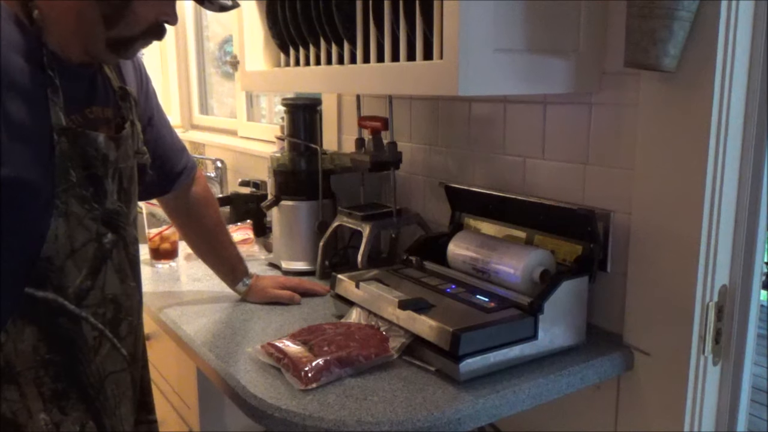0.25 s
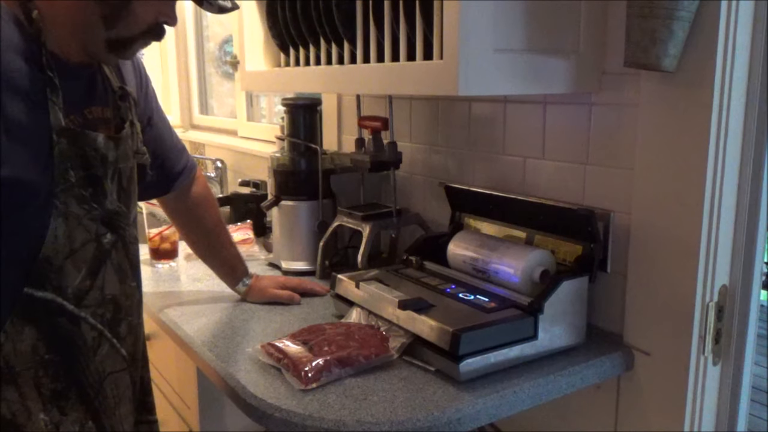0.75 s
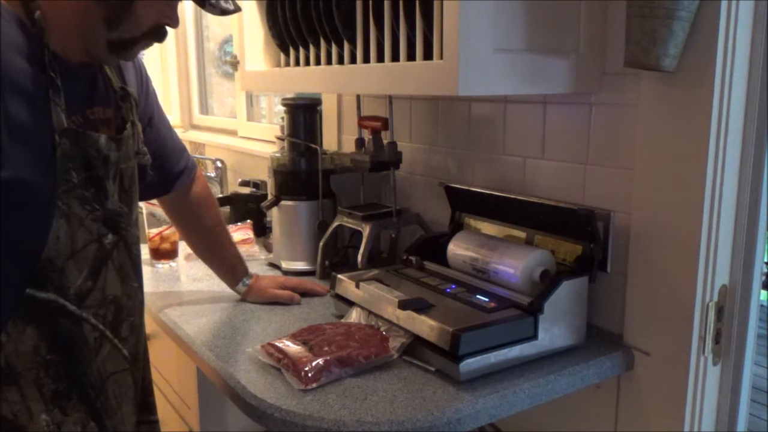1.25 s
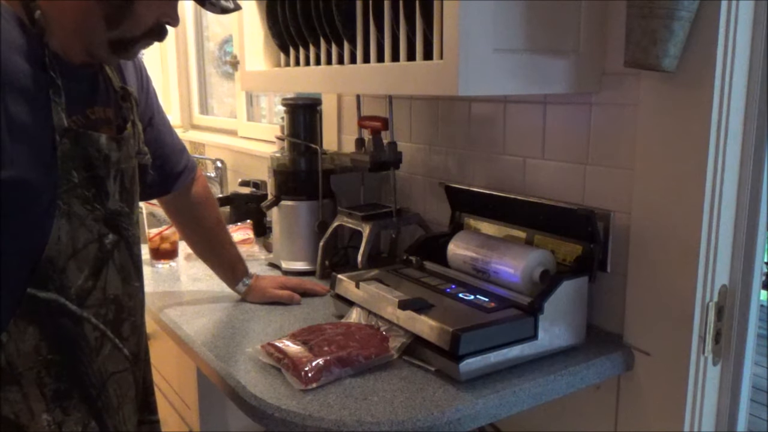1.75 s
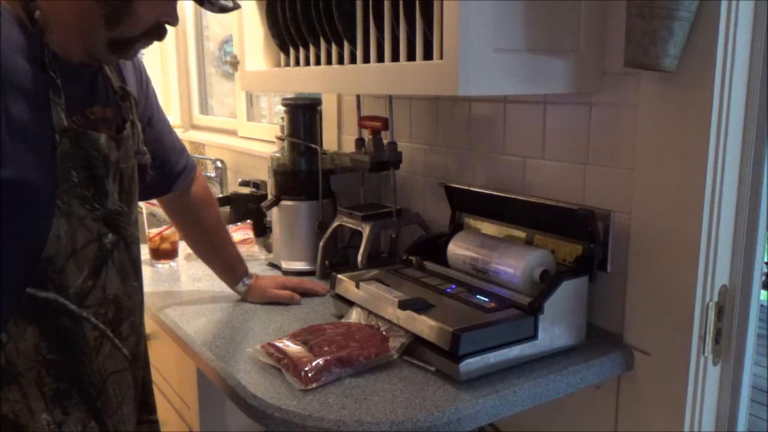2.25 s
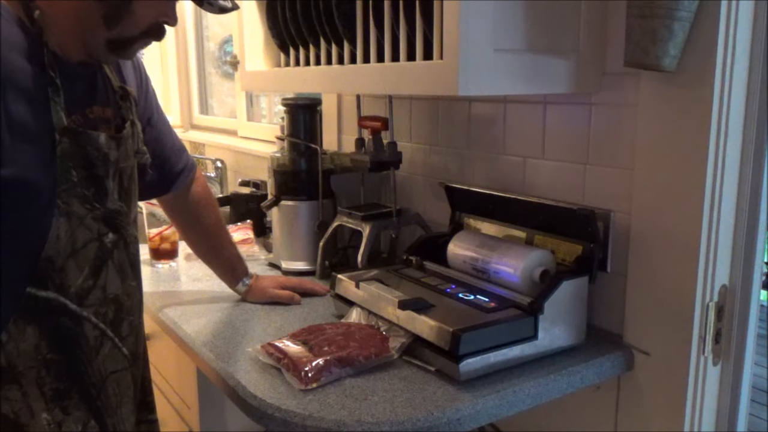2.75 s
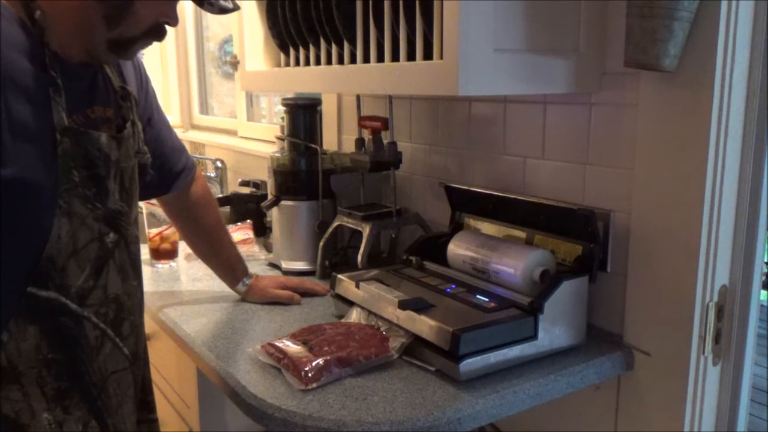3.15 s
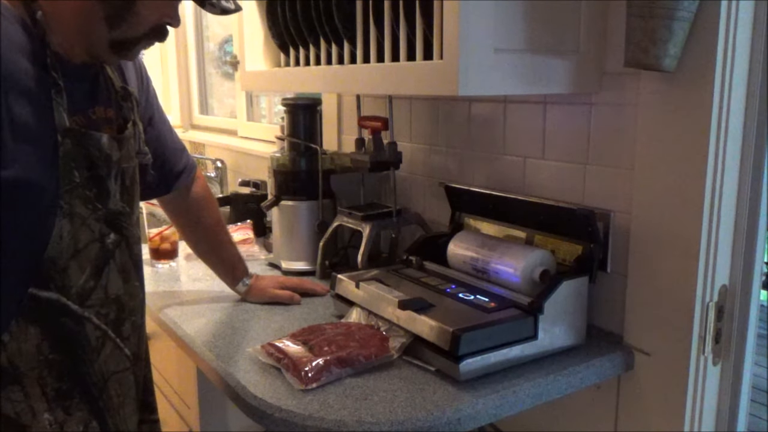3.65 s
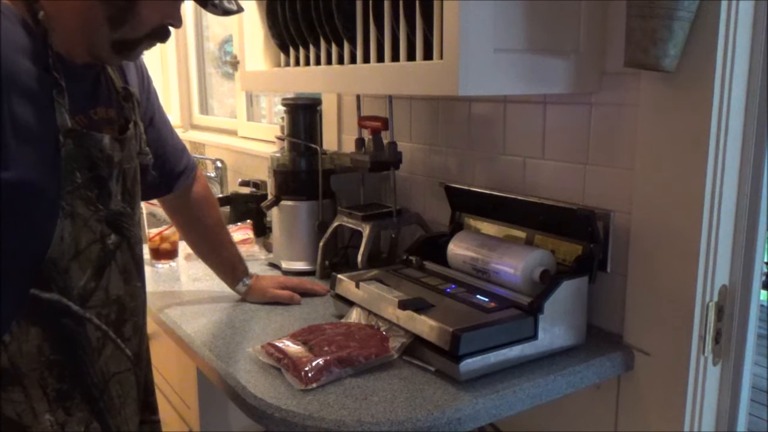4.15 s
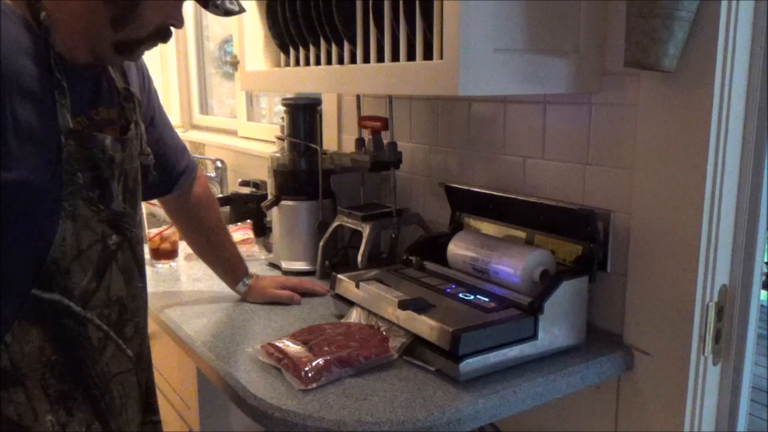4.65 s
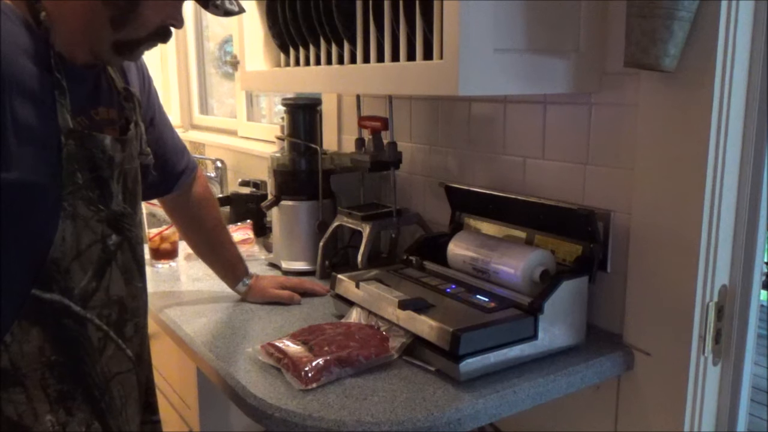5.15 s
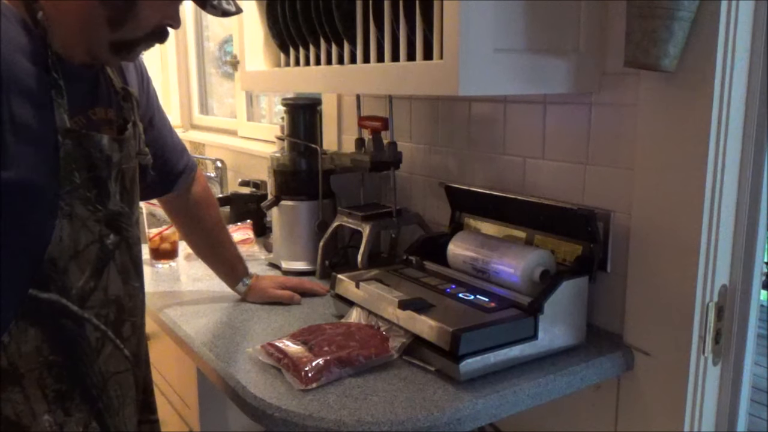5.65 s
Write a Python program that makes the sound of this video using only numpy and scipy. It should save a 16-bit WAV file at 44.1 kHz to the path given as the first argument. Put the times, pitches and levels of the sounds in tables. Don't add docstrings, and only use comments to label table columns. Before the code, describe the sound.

A vacuum sealer's diaphragm pump runs close by on a kitchen counter, a rough low buzz with rattling plastic and puffing air. It holds steady for most of the time, its tone shifting slightly as the bag tightens, then stops with a dull low thump. A short tiled-room echo, soft fridge hum, faint hiss and tiny squeaks remain.

```python
import sys
import numpy as np
from scipy import signal
from scipy.fft import rfft, irfft, next_fast_len
from scipy.io import wavfile
from scipy.ndimage import uniform_filter1d

SR = 44100
rng = np.random.default_rng(int(sys.argv[2]) if len(sys.argv) > 2 else 0)


def how_loud(loudness_db):
    steps = np.asarray(loudness_db, float) / 20
    return 10 ** steps


def int16_out(signal):
    q = np.round(np.clip(np.atleast_2d(signal).T, -1, 1) * 32767)
    wavfile.write(sys.argv[1], SR, q.astype(np.int16))


N = 260631
OFF_S = 4.701


def along(points, hz):
    f, v = np.transpose(points)
    return np.interp(np.log(hz + 1), np.log(f + 1), v)


def unit(x):
    return x / np.sqrt(np.mean(x ** 2) + 1e-20)


def curves(rows):
    s, *cols = np.transpose(rows)
    return [np.interp(np.arange(N) / SR, s, c) for c in cols]


def wobble(rate):
    return np.interp(np.arange(N) * rate / SR, np.arange(600), rng.standard_normal(600))


def filtered(x, response):
    m = next_fast_len(N + SR // 2)
    return irfft(rfft(x, m) * response(np.fft.rfftfreq(m, 1 / SR)), m)[..., :N]


def ringing(x, modes, vacuum):
    def response(f):
        total = 0
        for k, (hz, width, db, change_db) in enumerate(modes):
            resonance = 1j * f * width / (hz * hz - f * f + 1j * f * width)
            total = total + (-1) ** k * how_loud(db + vacuum * change_db) * resonance
        return total
    return filtered(x, response)


def crank():
    # start_s, speed_strokes_per_s
    speed_points = [(0, 43.72), (1.4, 43.665), (2.2, 43.715), (3, 43.76), (4.7, 43.82)]
    # start_s, length_s, extra_strokes_per_s
    surge = (3.812, .181, .38)
    first_stroke, coast_hz_per_s = .331, 115
    t = np.arange(N) / SR
    start, length, extra = surge
    speed = curves(speed_points)[0] + extra * ((t > start) & (t < start + length))
    speed = speed - coast_hz_per_s * np.clip(t - OFF_S, 0, None)
    return first_stroke + np.cumsum(np.clip(speed, .01, None)) / SR


def orders(modes, order, blows, turn, vacuum, stiffen, jitter, sway_db):
    stroke_hz = 43.72
    step = 128
    dead_hz, dead_width_hz = np.array([[302], [605], [959], [2447]]), 30
    hz, width, level_db, change_db, pan_db = np.transpose(modes)[..., None]
    place, blow_db = np.transpose(blows)
    speed = uniform_filter1d(np.gradient(turn) * SR / stroke_hz, size=1500)[::step]
    surge = np.clip(speed - 1.004, 0, None)
    slowing = np.clip(speed + .005, .01, 1)
    power = how_loud(2 * (level_db + change_db * vacuum[::step]) + np.array([pan_db, -pan_db]))
    knots = np.arange(len(speed)) * step / SR * 9
    spin = np.exp(2j * np.pi * (turn + jitter * wobble(40)))
    spin = np.resize(spin, (len(speed), step)).astype(np.complex64)
    tone = spin ** order[0]
    out = np.zeros((2, *spin.shape), np.float32)
    for k in order:
        lag = np.sum(how_loud(blow_db) * np.exp(-2j * np.pi * k * place))
        sway = np.interp(knots, np.arange(80), rng.standard_normal(80))
        f = k * stroke_hz * slowing * (1 - stiffen * surge)
        near = (f * width) ** 2 / ((hz * hz - f * f) ** 2 + (f * width) ** 2)
        dead = 1 / np.hypot(1, f * dead_width_hz / (dead_hz ** 2 - f * f + 1e-6))
        size = np.sqrt(2 * np.sum(power * near ** 2, axis=1)) * np.prod(dead, axis=0) * how_loud(sway_db * sway)
        out += size[..., None].astype(np.float32) * (tone * np.complex64(lag / abs(lag))).real
        tone = tone * spin
    return out.reshape(2, -1)[:, :N]


def base_and_counter(turn, vacuum, hum_db):
    # pitch_hz, width_hz, level_db, change_at_full_vacuum_db, left_right_db
    hum_modes = [(133, 111, -36.2, -2, 3), (233, 24, -17.9, -1, 4), (380, 24, -22.7, 2, -5),
                 (506, 115, -36.7, 0, 2), (679, 39, -30.8, -2, -1), (760, 59, -32.2, -1, 2),
                 (834, 24, -39.3, -3, -1), (891, 24, -25.3, 0, 0), (1017, 24, -31.4, 4, -3),
                 (1043, 24, -28.4, -1, -3), (1097, 24, -35.1, -2, -1), (1127, 27, -32.7, -20, -1),
                 (1196, 53, -35.6, -4, 1)]
    # place_in_stroke (0-1), level_db
    base_blows = [(0.251, -3.6), (0.286, -8.5), (0.366, 0.0), (0.457, -8.8), (0.986, -7.1)]
    # place_in_stroke (0-1), level_db
    counter_blows = [(0.121, -3.5), (0.263, 0.0), (0.564, -3.8), (0.634, -6.8), (0.863, -5.5)]
    base = orders(hum_modes, range(2, 15), base_blows, turn, vacuum,
                  stiffen=-0.23, jitter=0.0003, sway_db=0.7)
    counter = orders(hum_modes, range(15, 29), counter_blows, turn, vacuum,
                     stiffen=-0.12, jitter=0.00033, sway_db=1.65)
    return how_loud(1.79 * hum_db - 0.83) * base + how_loud(0.87 * hum_db - 0.42) * counter


def casing(turn, vacuum, valve_db):
    # pitch_hz, width_hz, level_db, change_at_full_vacuum_db, left_right_db
    casing_modes = [(1270, 56, -60.9, 20, 2), (1356, 24, -41.8, -13, 0), (1457, 26, -37.0, -17, -1),
                    (1586, 91, -37.5, 4, -1), (1725, 125, -28.1, 0, -1), (1897, 29, -25.7, -6, 0),
                    (1973, 87, -35.5, 4, 0), (2113, 31, -29.2, -3, -1), (2202, 32, -44.9, 7, -2),
                    (2325, 55, -35.3, -20, 4), (2401, 53, -49.6, 8, 2), (2518, 31, -45.0, -10, 2)]
    # place_in_stroke (0-1), level_db
    casing_blows = [(0.063, -0.6), (0.245, -1.9), (0.269, 0.0), (0.454, -3.3), (0.927, -8.9)]
    return how_loud(valve_db - 0.13) * orders(casing_modes, range(29, 59), casing_blows, turn, vacuum,
                                         stiffen=3.4, jitter=0.00017, sway_db=0.55)


def lid(turn, vacuum, valve_db):
    # pitch_hz, width_hz, level_db, change_at_full_vacuum_db, left_right_db
    lid_modes = [(2612, 65, -42.1, 7, -2), (2700, 228, -42.8, 0, -1), (2838, 24, -57.4, 19, 0),
                 (2864, 36, -42.1, -20, -5), (2946, 118, -42.5, -1, 0), (3161, 164, -44.7, 1, -1),
                 (3297, 34, -34.7, -20, 3), (3358, 24, -49.6, 3, 2), (3486, 89, -46.5, 2, 2),
                 (3638, 74, -43.0, -20, -1), (3776, 141, -49.8, 8, -1)]
    # place_in_stroke (0-1), level_db
    lid_blows = [(0.03, -3.4), (0.221, 0.0), (0.415, -2.3), (0.587, -6.1), (0.699, -4.2)]
    return how_loud(valve_db - 0.36) * orders(lid_modes, range(59, 89), lid_blows, turn, vacuum,
                                         stiffen=-2.3, jitter=0.00026, sway_db=2.2)


def reed(turn, vacuum, valve_db):
    # pitch_hz, width_hz, level_db, change_at_full_vacuum_db, left_right_db
    reed_modes = [(3861, 327, -48.0, 0, 0), (4072, 24, -51.7, -2, -1), (4174, 24, -40.6, -20, 0),
                  (4217, 400, -72.7, 19, 2), (4596, 151, -49.2, 9, 0), (4756, 88, -48.8, -19, 0),
                  (4903, 24, -45.6, -20, -1), (4987, 24, -60.7, 13, -2)]
    # place_in_stroke (0-1), level_db
    reed_blows = [(0.092, -6.6), (0.131, 0.0), (0.236, -4.4), (0.362, -6.5), (0.992, -3.7)]
    return how_loud(valve_db + 0.5) * orders(reed_modes, range(89, 115), reed_blows, turn, vacuum,
                                        stiffen=-0.68, jitter=0.0002, sway_db=2.2)


def valve_ticks(turn, scatter, spread_db):
    # place_in_stroke (0-1), level_db
    slaps = [
        (.03, 12),
        (.235, 13),
        (0.411, -14),
        (0.702, -35),
    ]
    ticks, stroke = np.zeros(N + 1), np.arange(211)
    for place, slap_db in slaps:
        for late in (0, .012, .03, .055):
            chance = rng.standard_normal((len(stroke), 2))
            when = stroke + place + late + scatter * (1 + 90 * late) * chance[:, 0]
            at = np.interp(when, turn, np.arange(N), left=N)
            np.add.at(ticks, at.astype(int), how_loud(slap_db - 60 * late + spread_db * chance[:, 1]))
    return ticks[:N]


def shell_rattle(turn, vacuum, valve_db):
    # pitch_hz, width_hz, level_db, change_at_full_vacuum_db
    shell = [(2685, 136, 0, 3.5), (2725, 120, -4.5, 8.5), (3280, 82, -10, -28), (3750, 350, -15, 8.5),
             (4640, 127, -12.5, 4), (6304, 53, 2.5, 3), (6627, 100, -0.5, 1), (6940, 140, -4.5, -1),
             (7810, 47, 0, -1), (8140, 170, -7.5, 4), (8660, 79, -17, -1.5), (9210, 175, -6.5, -1),
             (10260, 450, -16, -4)]
    ticks = valve_ticks(turn, scatter=.0004, spread_db=3.0) * how_loud(valve_db)
    slack, pulled = ringing(ticks, shell, 0), ringing(ticks, shell, 0.7)
    return how_loud(-28.5) * unit((1 - vacuum) * slack + vacuum * pulled)


def puff(turn, fall_db, leak_db):
    # pitch_hz, level_db (per Hz)
    puff_colour = [(300, -48), (900, -16.5), (1350, -14), (1750, -2), (2450, -9), (3000, -9.5),
                   (4300, -14.5), (5500, -7.5), (6500, -1), (8500, -8.5), (11000, -16)]
    part = turn % 1
    gate = how_loud(-fall_db * np.clip(part - .28, 0, 1)) * np.clip(part / 0.018, 0, 1) + how_loud(leak_db)
    size = how_loud(0.97 * wobble(30.3))
    return unit(filtered(gate * size * rng.standard_normal(N), lambda hz: how_loud(along(puff_colour, hz))))


def motor(apart):
    # pitch_hz, level_db (per Hz)
    motor_colour = [(20, -19), (60, -12), (90, -7), (220, 2.5), (310, -5.5), (400, 1), (600, -4),
                    (1000, -1.5), (1330, -8.5), (1750, 0), (2450, -10), (4000, -13.5), (11000, -49)]
    mid, side = filtered(rng.standard_normal((2, N)), lambda hz: how_loud(along(motor_colour, hz)))
    return unit(np.array([mid + apart * side, mid - apart * side]))


def pump():
    # start_s, vacuum (0-1)
    vacuum_points = [
        (0, 0),
        (2.6, 0.04),
        (3.2, 0.5),
        (3.8, 0.8),
        (4.0, 0.83),
        (6, 0.8),
    ]
    # time_after_switch_off_s, hum_db, valve_db
    dying = [
        (.007, 1, 0.5),
        (.019, -8, -20),
        (.059, -12, -27),
        (.099, -24, -48),
        (.159, -74, -97),
    ]
    turn, vacuum = crank(), curves(vacuum_points)[0]
    hum_db, valve_db = curves([(OFF_S + s, *db) for s, *db in dying])
    tones = base_and_counter(turn, vacuum, hum_db) + casing(turn, vacuum, valve_db)
    tones = tones + lid(turn, vacuum, valve_db) + reed(turn, vacuum, valve_db)
    air = how_loud(valve_db - 26.0) * puff(turn, fall_db=67, leak_db=-4.5)
    running = how_loud(0.49 * hum_db - 29.5) * motor(apart=0.66)
    return tones, shell_rattle(turn, vacuum, valve_db) + air + running


def kitchen(x):
    # pitch_hz, fade_s
    echo_fade = [(100, 0.4), (400, 0.49), (1500, 0.55), (4000, 0.4), (10000, 0.22)]
    hz, t, z = signal.stft(rng.standard_normal((2, SR // 2)), SR, nperseg=256)
    fade = how_loud(-60 * t / along(echo_fade, hz)[:, None])
    tail = signal.istft(z * fade, SR, nperseg=256)[1]
    late = np.pad(x, (300, 0))
    return signal.fftconvolve(late[None], tail / np.linalg.norm(tail[0]), axes=1)[:, :N]


def quiet():
    # pitch_hz, level_db (per Hz)
    quiet_colour = [(15, -50), (25, -24), (60, -7), (105, -16.5), (150, 1), (210, -10), (310, -7),
                    (450, -15.5), (670, -12.5), (930, -18.5), (1060, -17.5), (1300, -22), (3500, -27.5),
                    (11000, -32.5)]
    # pitch_hz, likeness (0-1)
    likeness = [(60, 0.95), (220, 0.93), (830, 1), (3080, 0.95), (11400, 0.6)]

    def response(hz):
        angle = np.arccos(np.clip(along(likeness, hz), -1, 1)) / 2
        return how_loud(along(quiet_colour, hz)) * [np.cos(angle), np.sin(angle)]

    mid, side = filtered(rng.standard_normal((2, N)), response)
    level = how_loud(-43.5 - 3.5 + 0.51 * wobble(6)) * how_loud([[.6], [-.6]])
    return level * unit(np.array([mid + side, mid - side]))


def fridge():
    # pitch_hz, level_db
    hum_hz, hum_level_db = (150.7, -57)
    swell = how_loud(hum_level_db + 2.4 * wobble(8)) * np.sqrt(2)
    return swell * np.sin(2 * np.pi * hum_hz * np.arange(N) / SR + .8 * wobble(7))


def settle():
    # pitch_hz, level_db, fade_s (to fall by 60 dB)
    rocking = [(175.4, -26.5, 0.21), (258.5, -32.5, 0.26), (396, -30.5, .3)]
    t = np.clip(np.arange(N) / SR - OFF_S, 0, None)
    rings = sum(how_loud(db - 60 * t / fade_s) * np.sin(2 * np.pi * hz * t) for hz, db, fade_s in rocking)
    return rings * (1 - np.exp(-t / .025)) * 3


def squeaks():
    # start_s, level_db
    leak = [
        (0, -70),
        (4.8, -49),
        (4.95, -58.5),
        (5.1, -58),
        (5.3, -57.5),
        (5.5, -56),
        (5.7, -58),
        (5.91, -57),
    ]
    # pitch_hz, width_hz, level_db, change_at_full_vacuum_db
    seal = [(4450, 330, -4.5, 0), (4950, 210, 2.5, 0), (5460, 770, -6, 0), (7200, 980, -10, 0)]
    # start_s, length_s, start_pitch_hz, end_pitch_hz, level_db
    whistles = [
        (5.4, .045, 4220, 4250, -63),
        (5.45, .028, 4380, 4370, -54),
        (5.497, .032, 4380, 4370, -54),
        (5.375, .065, 9300, 10500, -68),
        (5.438, .022, 10700, 11000, -60),
        (5.652, .02, 7200, 7200, -62),
        (5.852, .012, 2050, 1950, -55),
    ]
    out = how_loud(curves(leak)[0] + 2.0 * wobble(28)) * unit(ringing(rng.standard_normal(N), seal, 0))
    for s, length, from_hz, to_hz, db in whistles:
        glide = np.linspace(from_hz, to_hz, int(length * SR))
        whistle = np.hanning(len(glide)) ** .5 * np.sin(2 * np.pi * np.cumsum(glide) / SR)
        out[int(s * SR):][:len(glide)] += how_loud(db) * whistle
    return out


def scene():
    tones, noise = pump()
    release = np.clip((np.arange(N) / SR - 4.7) / .025, 0, 1)
    room = how_loud(-8.5 + 1.4 * release) * kitchen(noise.mean(axis=0))
    smeared = tones.mean(axis=0) * unit(.3 + wobble(95))
    room = room + how_loud(-11.5) * release * kitchen(smeared)
    return tones + noise + room + quiet() + fridge() + squeaks() + settle()


def top_cut(x):
    return signal.sosfilt(signal.butter(12, 12040, fs=SR, output="sos"), x)


def record(dry):
    top_hz = 11060
    inside = filtered(dry, lambda hz: 1 / (1 + (hz / top_hz) ** 300))
    mid = inside.mean(axis=0)
    bend = mid / (1 + np.abs(mid / .68) ** 6) ** (1 / 6) - mid
    spill = filtered(bend, lambda hz: how_loud(-26 * np.clip(hz - top_hz, 0, None) / 1000 + 8 * (hz > top_hz)))
    return top_cut(inside + spill)


dry = scene()
out = record(dry)
int16_out(out)
```